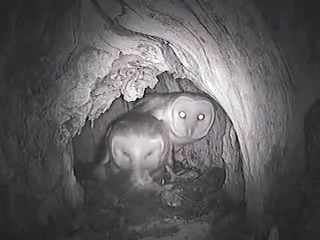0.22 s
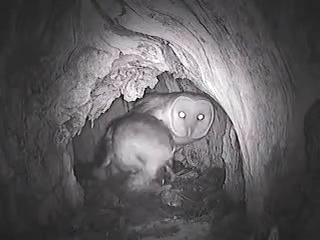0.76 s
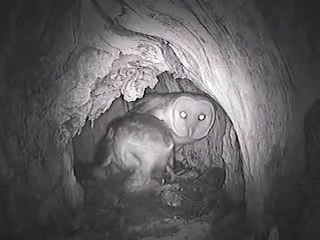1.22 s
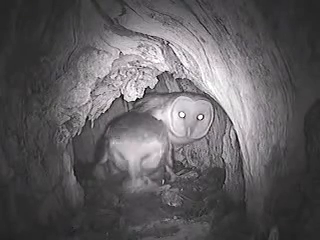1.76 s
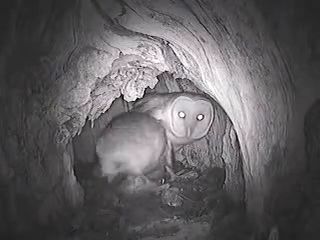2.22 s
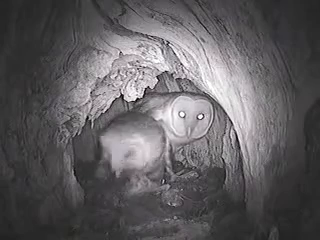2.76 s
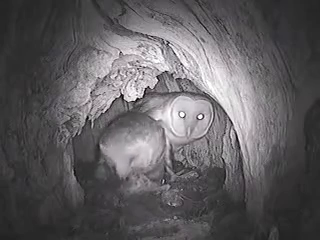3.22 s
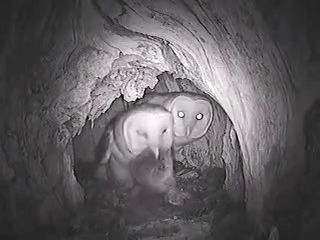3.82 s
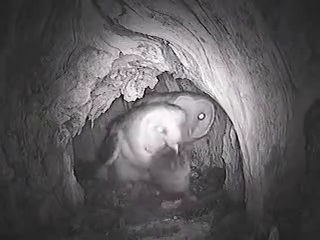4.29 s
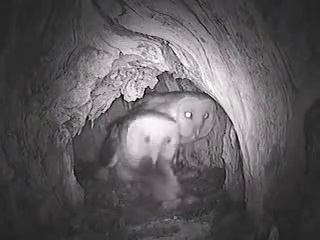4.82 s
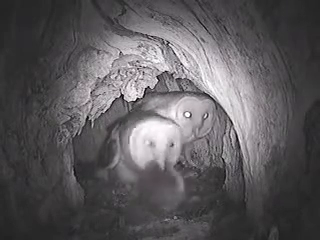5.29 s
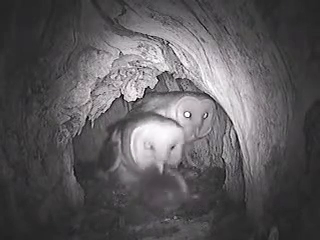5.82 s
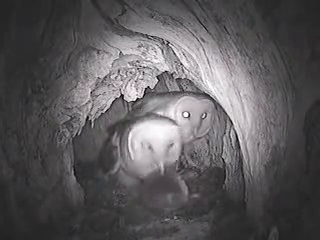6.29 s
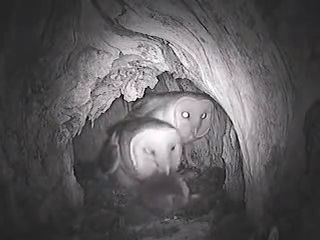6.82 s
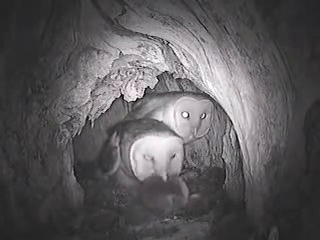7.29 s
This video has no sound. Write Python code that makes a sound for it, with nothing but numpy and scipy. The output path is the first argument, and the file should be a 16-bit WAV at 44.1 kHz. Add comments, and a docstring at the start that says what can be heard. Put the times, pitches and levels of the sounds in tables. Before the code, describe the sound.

A barn owl gives nine harsh, whistling screeches inside a hollow tree, close and slightly distorted, over a steady low hum and hiss.

```python
"""A barn owl screeches nine times in a hollow tree, close to a nest camera with steady hum and hiss.
From 0.2 s it calls four times, bowed: a squeak, then a shaky, arching whistle over a rasp, with noisy
overtones and breath hiss, coloured by the hollow. The calls overload the microphone and its limiter.
From 2.4 s litter rustles in the gaps. Two upright calls follow at 3.7 and 4.3 s. From 5.4 s it leans
forward for three more, each with a low gust; a faint wheeze trails the seventh and the last."""
import sys
import numpy as np
from scipy import signal
from scipy.fft import rfft, irfft
from scipy.io import wavfile
from scipy.ndimage import uniform_filter1d, minimum_filter1d

SR = 44100
rng = np.random.default_rng(int(sys.argv[2]) if len(sys.argv) > 2 else 0)


def bounce(signal):
    """Save signal as a 16-bit WAV file at the path given by the first command-line argument."""
    frames = np.transpose(np.atleast_2d(signal))
    limited = np.clip(frames, -1, 1)
    pcm = np.round(limited * 32767).astype(np.int16)
    wavfile.write(sys.argv[1], SR, pcm)


N = 332955
T = np.arange(N) / SR
FREQS = np.maximum(np.arange(N // 2 + 1) * SR / N, 1)
HISS_LEAD_S, TAIL_S = 0.034, 0.046  # before and after each screech


def undb(db):
    """Decibels to gain."""
    return 10 ** (np.asarray(db) / 20)


def unit(x):
    """Scale to rms 1."""
    return x / np.sqrt(np.mean(np.abs(x) ** 2))


def colour(x, db):
    """Filter by a gain in dB at each frequency."""
    return irfft(rfft(x) * undb(db), N)


def noise(points):
    """Noise of rms 1, shaped by (frequency [Hz], level [dB]) points."""
    hz, db = np.transpose(points)
    return unit(colour(rng.standard_normal(N), np.interp(np.log(FREQS), np.log(hz), db)))


def wander(size, hz, order=2):
    """Random drift of rms 1, low-passed at hz."""
    lowpass = signal.butter(order, hz, fs=SR, output="sos")
    return unit(signal.sosfilt(lowpass, rng.standard_normal(size)))


def band(hz, width_hz, order=2):
    """Turbulence in a resonance whose centre follows hz."""
    phase = 2 * np.pi * np.cumsum(hz) / SR
    in_phase = wander(len(hz), width_hz / 2, order)
    quadrature = wander(len(hz), width_hz / 2, order)
    return in_phase * np.cos(phase) + quadrature * np.sin(phase)


def bump(t_s, half_width_s):
    """Gaussian swell, peak 1 at t_s = 0."""
    return np.exp(-(t_s / half_width_s) ** 2)


def electronics(hiss_db=-55.5):
    """Mains hum over the camera's steady hiss."""
    # mains harmonics: (frequency [Hz], rms level [dB])
    harmonics = [(60, -53.5), (120, -77.5), (180, -78)]
    # hiss spectrum: (frequency [Hz], relative level [dB])
    hiss_spectrum = [(20, -7.5), (45, 6), (110, -3), (180, -7.5), (320, -10), (600, -13.5), (1500, -17.5),
                     (3000, -20.5), (5000, -23.5), (5700, -26.5), (6300, -21.5), (7300, -26)]
    hum = sum(undb(db) * np.sqrt(2) * np.sin(2 * np.pi * (hz * T + rng.random())) for hz, db in harmonics)
    return hum + undb(hiss_db) * noise(hiss_spectrum)


def litter(half_width_s=0.019):
    """Feet shift in dry nest litter."""
    # scuffs: (time [s], level [dB])
    scuffs = [(2.42, -68), (3.335, -58.5), (3.5, -60.5), (5.059, -70.5), (6.17, -62), (6.915, -59.5)]
    swell = sum(undb(db) * bump(T - time_s, half_width_s) for time_s, db in scuffs)
    return swell * noise([(300, -3), (2200, -13.5), (5000, -16.5), (7000, -23)])


def wheezes():
    """A faint rising hiss from the owl's throat."""
    # breaths: (start [s], length [s], start centre [Hz], end centre [Hz], level [dB])
    breaths = [(5.72, 0.36, 2150, 2470, -63.5), (7.457, 0.326, 2070, 2410, -57.5)]
    out = np.zeros(N)
    for start_s, length_s, from_hz, to_hz, db in breaths:
        progress = np.clip((T - start_s) / length_s, 0, 1)
        arch = np.sqrt(4 * progress * (1 - progress))
        out += undb(db) * arch * band(from_hz + (to_hz - from_hz) * progress, width_hz=240)
    return out


def gusts():
    """Facing the camera, the owl's hardest pushes rumble on the microphone."""
    # puffs of air: (time [s], half-width [s], level [dB])
    puffs = [(5.651, 0.033, -36), (6.623, 0.051, -39), (7.324, 0.1, -41)]
    swell = sum(undb(db) * bump(T - time_s, half_width_s) for time_s, half_width_s, db in puffs)
    return swell * noise([(30, -8.5), (90, -2.5), (200, -2), (400, -31.5), (1000, -49.5)])


def flares():
    """Late in some screeches the air jet sizzles in one high resonance."""
    # sizzles: (time [s], half-width [s], centre [Hz], level [dB])
    sizzles = [(3.054, 0.047, 5690, -26), (3.948, .06, 5000, -26.5), (4.527, 0.0525, 5190, -28),
               (7.393, 0.031, 5600, -27)]
    return sum(undb(db) * bump(T - time_s, half_width_s) * band(np.full(N, hz), width_hz=950)
               for time_s, half_width_s, hz, db in sizzles)


def squeaks(glide_per_s=9.3, jitter=0.042, flutter=0.39):
    """The syrinx starts up: brief, hoarse rising notes with their octave."""
    # notes: (time [s], half-width [s], pitch [Hz], level [dB], relative octave level [dB])
    notes = [(0.199, 0.0109, 1053, -34.5, 4.5), (1.057, 0.006, 1089, -35, -20),
             (1.944, .005, 963, -41, 2.5), (1.960, 0.0059, 1003, -27.5, -2),
             (2.797, 0.0051, 900, -36.5, -9), (2.822, 0.0064, 1130, -27.5, 5.5),
             (3.688, 0.0075, 996, -47, -4.5), (3.704, 0.004, 930, -31, -10), (4.311, 0.008, 932, -30, -10),
             (5.405, 0.0019, 930, -24.5, -15), (6.366, 0.00492, 934, -33, 8.5),
             (7.148, .005, 880.4, -26, -16.5)]
    out = np.zeros(N)
    for time_s, half_width_s, hz, db, octave_db in notes:
        span = np.abs(T - time_s) < 3 * half_width_s
        age_s = T[span] - time_s
        pitch_hz = hz * (1 + glide_per_s * age_s + jitter * wander(len(age_s), hz=300))
        phase = 2 * np.pi * np.cumsum(pitch_hz) / SR
        swell = undb(db) * bump(age_s, half_width_s) * (1 + flutter * wander(len(age_s), hz=350))
        out[span] += swell * (np.sin(phase) + undb(octave_db) * np.sin(2 * phase))
    return out


def scatter(x, wet_db, decay_s, taps=900):
    """Rough wood returns dense echoes, new with each turn of the head."""
    lag_s = np.arange(taps) / SR
    echoes = rng.standard_normal(taps) * np.exp(-lag_s / decay_s) * (lag_s > 0.003)
    response = undb(wet_db) * echoes / np.linalg.norm(echoes) + (lag_s == 0)
    return signal.fftconvolve(x, response / np.linalg.norm(response))[:len(x)]


def hollow(x, resonances):
    """The walls add spectral peaks and dips."""
    gain_db = sum(db / (1 + ((FREQS - hz) / half_width_hz) ** 2) for hz, half_width_hz, db in resonances)
    return colour(x, gain_db)


def envelope_db(age_s, length_s, lead_s, attack_s, start_db, cut_db, cut_s=0.0075, floor_db=-35):
    """Lead-in, quick attack, hold, sudden cut, short tail."""
    times_s = [-lead_s, 0, attack_s, length_s, length_s + cut_s, length_s + TAIL_S]
    return np.interp(age_s, times_s, [floor_db, start_db, 0, 0, cut_db, floor_db])


def effort(age_s, length_s, crest_share, drive, voice_fade_db=-11, sag_per_s=2.5):
    """Pitch, voice level and hiss level: the push grows to a crest, then slackens."""
    early_hz, crest_hz, early_voice_db, crest_voice_db, early_hiss_db, crest_hiss_db, hiss_fade_db = drive
    crest_s = crest_share * length_s
    push = np.clip(age_s / crest_s, 0, 1)
    slack = np.clip((age_s - crest_s) / (length_s - crest_s), 0, 1)
    scoop = 0.17 * np.exp(-np.maximum(age_s, 0) / 0.024)
    sag = sag_per_s * (length_s - crest_s) * slack ** 1.25
    hz = (early_hz + (crest_hz - early_hz) * push) * (1 - scoop - sag)
    voice_db = early_voice_db + (crest_voice_db - early_voice_db) * push + voice_fade_db * slack ** 3.5
    voice_db += envelope_db(age_s, length_s, lead_s=0.018, attack_s=0.01325, start_db=-8.5, cut_db=-17.5)
    hiss_db = early_hiss_db + (crest_hiss_db - early_hiss_db) * push ** 1.2 + hiss_fade_db * slack ** 1.7
    hiss_db += envelope_db(age_s, length_s, HISS_LEAD_S, attack_s=0.017, start_db=-6, cut_db=-12.5)
    return hz, voice_db, hiss_db


def whistle(hz, purity, flutter=0.58, flutter_hz=170):
    """Syrinx membranes: one tone, fluttering less as purity rises."""
    tone = np.sin(2 * np.pi * np.cumsum(hz) / SR)
    return unit(tone * (1 + flutter / purity * wander(len(hz), flutter_hz)))


def screech(age_s, hz, voice_db, hiss_db, timbre, breath, jitter=0.0258):
    """A shaky whistle over a lower rasp; air hisses through its overtones."""
    whistle_db, second_db, third_db, fourth_db, top_db = timbre
    size = len(age_s)
    shaky_hz = hz * (1 + jitter * wander(size, hz=80))
    # more air drives the whistle sharp and roughens it
    air = np.interp(hiss_db - voice_db, [-15, 0], [0, 1])
    purity = undb(5.5 - 4.6 * air + 0.5 * bump(age_s, half_width_s=0.039))
    rasp = undb(-4) * band(0.95 * hz, width_hz=327, order=3)
    rasp += undb(-11) * band(0.3 * hz + 640, width_hz=358, order=4)
    tone = undb(whistle_db) * whistle(shaky_hz * (1.003 + 0.04 * air), purity)
    voice = unit(tone + rasp / purity)
    overtones = (undb(second_db) * band(2.12 * hz, width_hz=858)
                 + undb(third_db) * band(2.95 * hz, width_hz=500)
                 + undb(fourth_db) * band(3.96 * hz, width_hz=590))
    top_hiss = undb(top_db - 6.5) * band(np.full(size, 7050), width_hz=410)
    jet = undb(0.83 * air + 6.5) * breath + overtones + top_hiss
    # a faster jet is brighter
    dull = signal.sosfiltfilt(signal.butter(3, 4100, fs=SR, output="sos"), jet)
    treble_gain = undb(0.37 * np.clip(hiss_db + 22, -18, 6))
    spurts = undb(0.53 * wander(size, hz=140))
    hiss = unit(dull + treble_gain * (jet - dull)) * spurts
    return voice * undb(voice_db) + scatter(hiss * undb(hiss_db), wet_db=-5, decay_s=0.0064)


def owl():
    """Nine screeches, each coloured by the head's place in the hollow."""
    # calls: (start [s], length [s], crest [share of length], posture,
    #   drive: early pitch [Hz], crest pitch [Hz], early voice [dB], crest voice [dB],
    #     early hiss [dB], crest hiss [dB], hiss fade after the crest [dB],
    #   timbre: whistle [dB], 2nd partial [dB], 3rd [dB], 4th [dB], top hiss trim [dB])
    calls = [ (0.205, 0.38, 0.82, "bowed", 1280, 1488, -15.5, -20, -29, -23.5, -23.5, -3.5, 0, 4, -3, -4),
             (1.075, 0.36, 0.69, "bowed", 1323, 1468, -17.5, -16.5, -26.5, -20.5, -21, -2, 1, 2, -8.5, -3),
             (1.964, 0.33, 0.748, "bowed", 1253, 1412, -15, -18, -29, -24.5, -17, 1.5, 2.5, 0, -3.5, -17),
             (2.820, 0.33, 0.72, "bowed", 1350, 1501, -15, -21, -25, -21, -20, -3, 6.5, 5.5, -3.5, -2.5),
             (3.723, 0.34, .77, "upright", 1207, 1342, -24.5, -26.5, -25.5, -22.5, -20.5, 0, 5, -7, -8, -2.5),
             (4.319, 0.3, 0.72, "upright", 1210, 1322, -15.5, -22, -26, -22, -17, .5, 5.5, -1.5, -5, 0.5),
             (5.417, 0.30214, 0.78, "forward", 1183, 1244, -17.5, -15, -25.5, -19.5, -12.5, 1.5, 6.5, -2, -6, -5.5),
             (6.371, 0.3, .82, "forward", 1192, 1279, -15, -15, -23, -22, -5.5, -1, 4.5, -3, -8, 4),
             (7.164, 0.2971, .77, "forward", 1168, 1295, -14.5, -17, -25, -19.5, -16, -3, 6, -2, -4, 1.5)]
    # breath noise of the open beak: (frequency [Hz], relative level [dB])
    breath_spectrum = [(120, -41), (230, -15.5), (330, 2.5), (600, -3), (950, -3), (1600, 7.5), (2100, 3),
                       (2800, -4), (3700, -1), (4400, -0.5), (5400, -5), (6300, -1.5), (7400, -7.5)]
    # wall peaks and dips per posture: (frequency [Hz], half-width [Hz], gain [dB])
    walls = { "bowed": [(160, 25, -13), (560, 40, 6), (733, 38, -27), (1739, 85, -22), (2090, 130, 4.5),
             (2886, 49, -2.5), (3174, 100, -16.5), (3643, 48, -10), (4000, 270, 2.5), (4450, 580, -2.5),
             (5570, 70, 5.5), (5770, 80, -3), (6280, 73, 0.5), (6520, 80, -2)],
             "upright": [(164, 78, -24.5), (765, 33, -37.5), (900, 225, 8.5), (1106, 132.6, -7.5),
             (1508, 60, -22), (2030, 530, -2), (2614, 63, 8), (3220, 91, -17.5), (3260, 80, 6.5),
             (4170, 140, -22), (5000, 300, 8.5), (5300, 55, -2), (5560, 59, -2.5), (5860, 60, -2.5),
             (6460, 110, -10)], "forward": [(258, 29, -19), (785.4, 31, -20), (1644, 100, -11),
             (2150, 320, -3.5), (2830, 370, 4), (3260, 170, -6.5), (3750, 130, 0), (5143, 200, 8.5),
             (5560, 110, 6), (6030, 100, -1.5), (6717, 90, -1)]}
    shudder_db = {"bowed": -1.23, "upright": -0.5, "forward": 1.9}
    breath = noise(breath_spectrum)
    tracks = {posture: np.zeros(N) for posture in walls}
    for start_s, length_s, crest_share, posture, *settings in calls:
        drive, timbre = settings[:7], settings[7:]
        span = (T >= start_s - HISS_LEAD_S) & (T <= start_s + length_s + TAIL_S)
        age_s = T[span] - start_s
        shudder = undb(shudder_db[posture] * wander(len(age_s), hz=45))
        hz, voice_db, hiss_db = effort(age_s, length_s, crest_share, drive)
        tracks[posture][span] += shudder * screech(age_s, hz, voice_db, hiss_db, timbre, breath[span])
    return sum(hollow(tracks[posture], walls[posture]) for posture in walls)


def limiter(x, limit=0.22, window_samples=130):
    """The gain dips for a few milliseconds around each peak over the limit."""
    gain = minimum_filter1d(limit / np.maximum(np.abs(x), limit), window_samples)
    return x * uniform_filter1d(gain, window_samples)


def scene():
    """The owl in its hollow, mono."""
    return (owl() + squeaks() + flares() + gusts() + wheezes() + litter() + electronics())[None]


def record(dry, drive_db=1.02, knee=4.13, camera_rate_hz=16000, band_hz=7300, top_hz=10471):
    """Microphone overload, then limiter; the camera's low sample rate cuts and mirrors the treble."""
    driven = dry[0] * undb(drive_db)
    ceiling = 0.3 * (1 + 0.013 * np.sign(driven))  # one side gives way sooner
    clipped = driven / (1 + np.abs(driven / ceiling) ** knee) ** (1 / knee)
    rolloff_db = np.interp(FREQS - band_hz, [-44.5, 29.5, 1290, 2508.5], [-0.5, -22, -34.5, -73.5])
    narrow = colour(limiter(clipped), rolloff_db)
    leak_db = np.interp(FREQS, [8700, 10000, 11000], [-11, -33, -60])
    mirror = colour(narrow * 2 * np.cos(2 * np.pi * camera_rate_hz * T), leak_db)
    lowpass = signal.ellip(8, 0.2, 70, top_hz, fs=SR, output="sos")
    return signal.sosfilt(lowpass, narrow + mirror)[None]


dry = scene()
out = record(dry)
bounce(out)
```